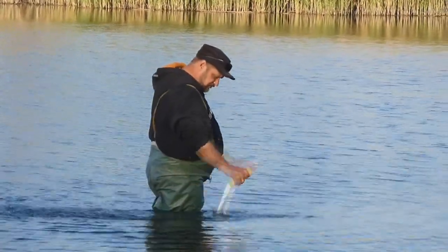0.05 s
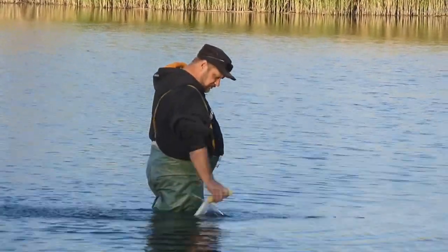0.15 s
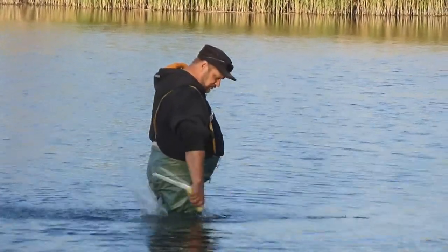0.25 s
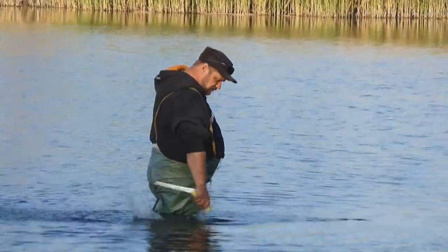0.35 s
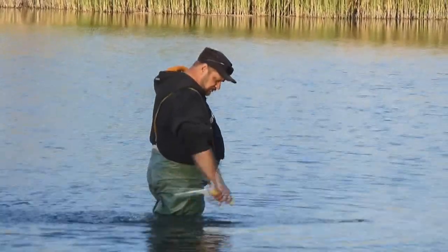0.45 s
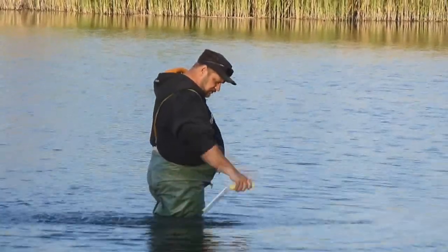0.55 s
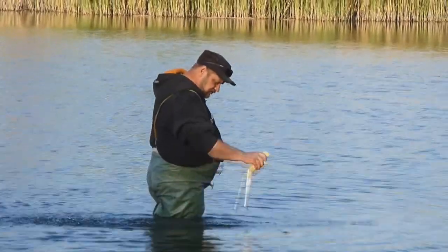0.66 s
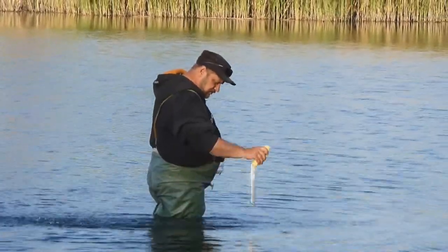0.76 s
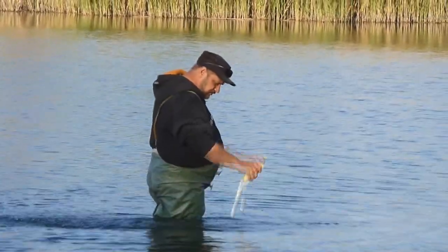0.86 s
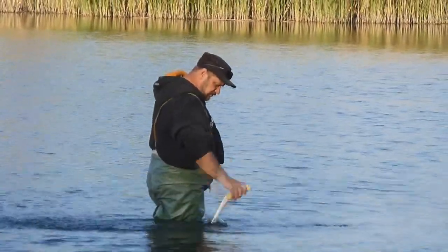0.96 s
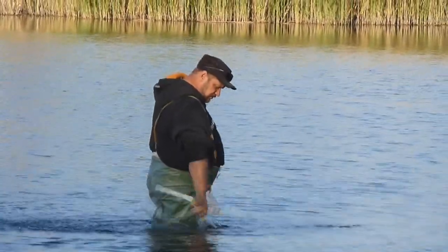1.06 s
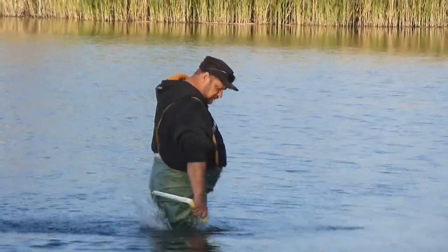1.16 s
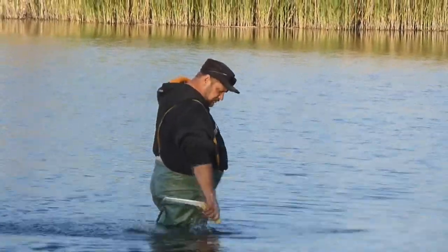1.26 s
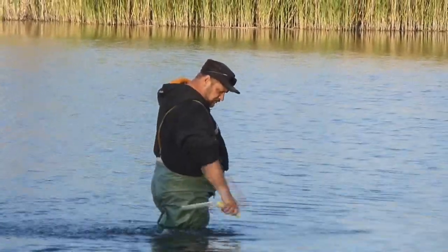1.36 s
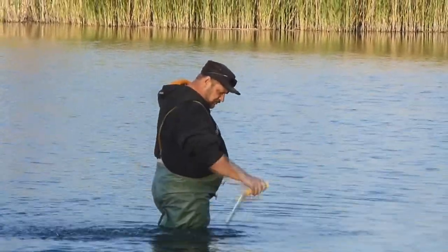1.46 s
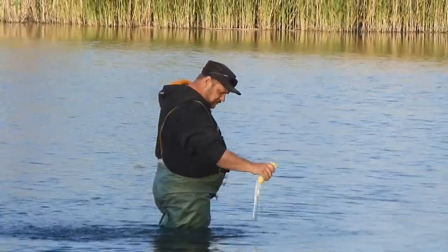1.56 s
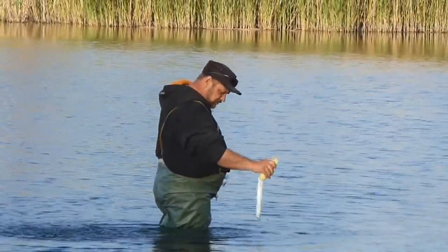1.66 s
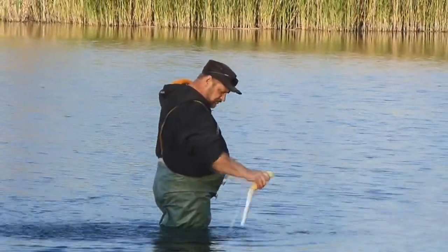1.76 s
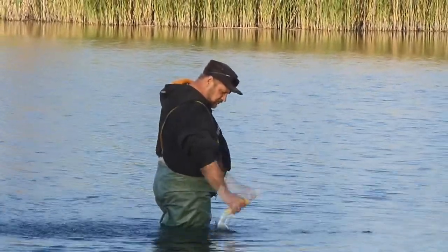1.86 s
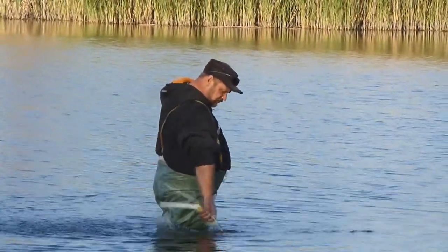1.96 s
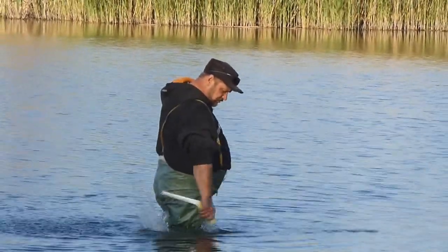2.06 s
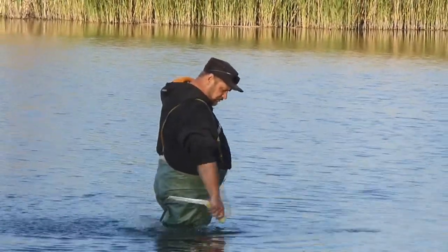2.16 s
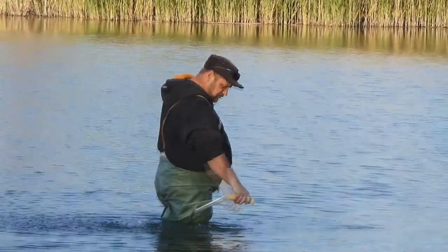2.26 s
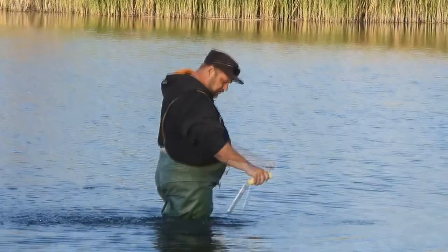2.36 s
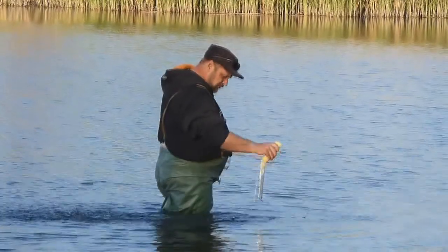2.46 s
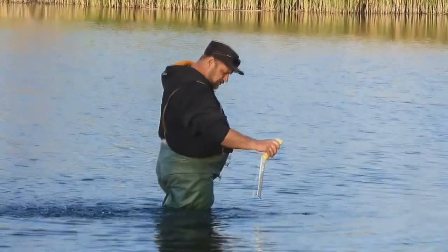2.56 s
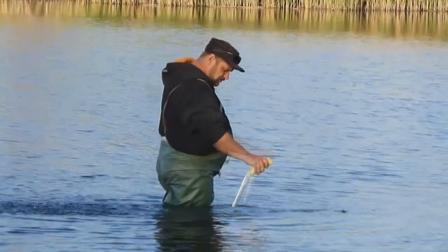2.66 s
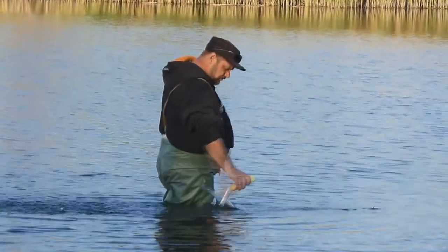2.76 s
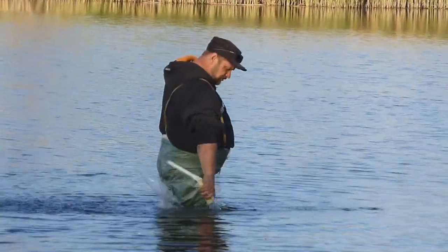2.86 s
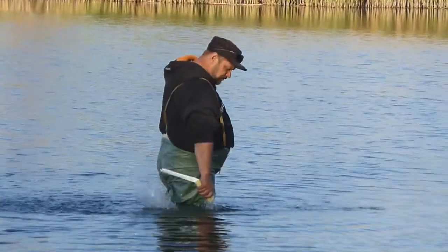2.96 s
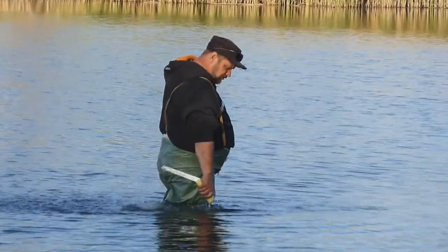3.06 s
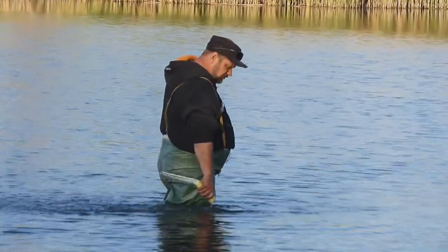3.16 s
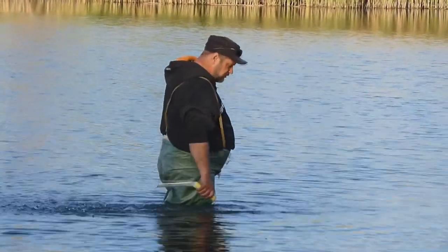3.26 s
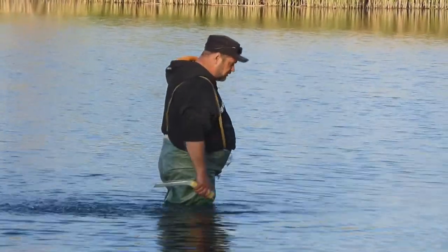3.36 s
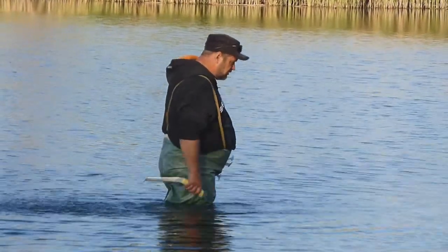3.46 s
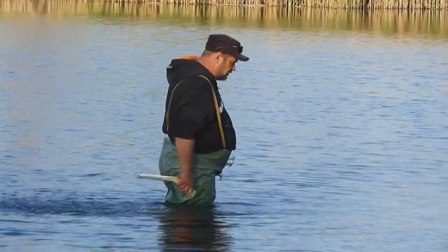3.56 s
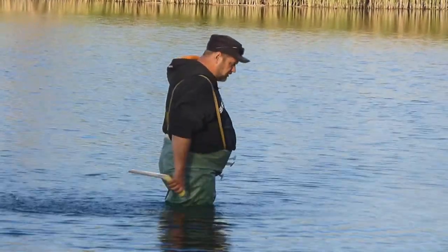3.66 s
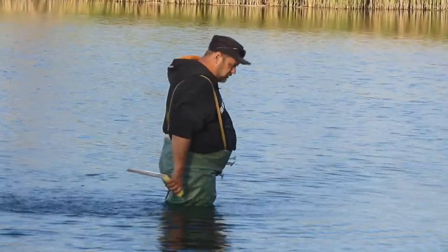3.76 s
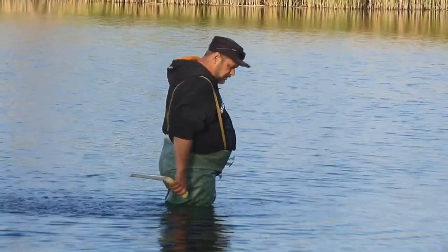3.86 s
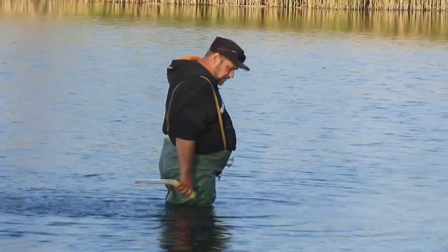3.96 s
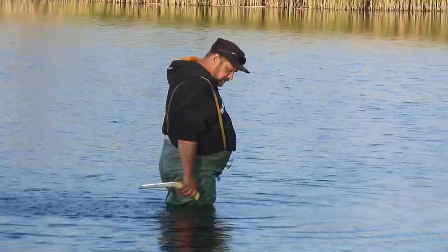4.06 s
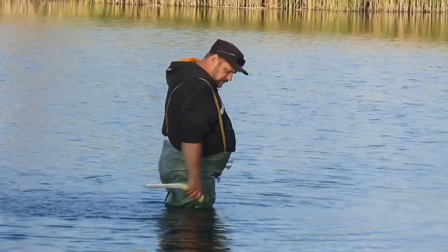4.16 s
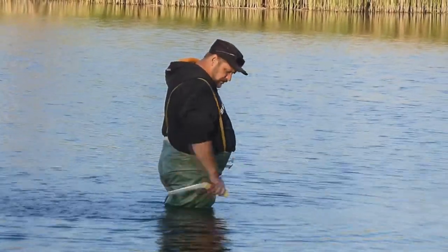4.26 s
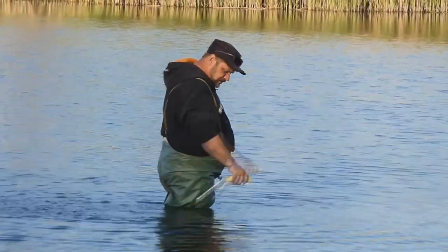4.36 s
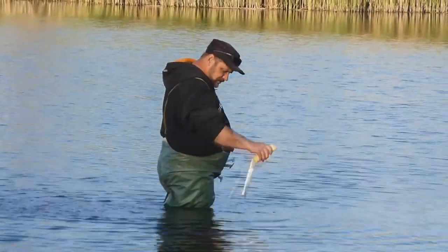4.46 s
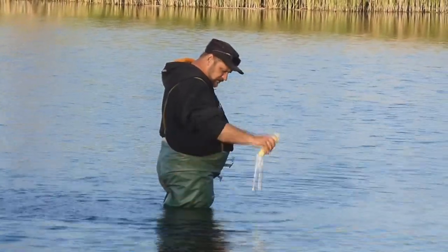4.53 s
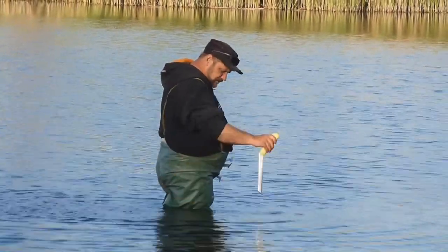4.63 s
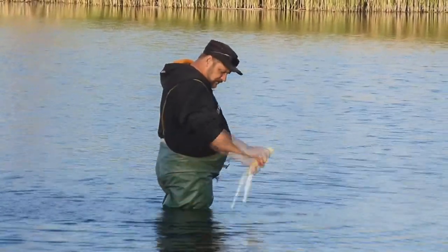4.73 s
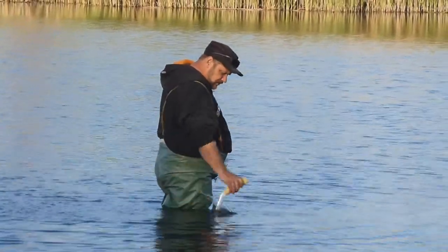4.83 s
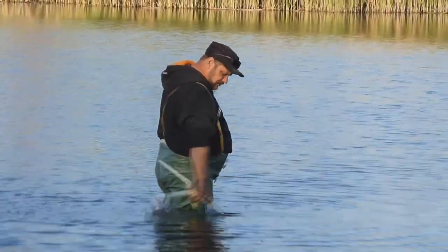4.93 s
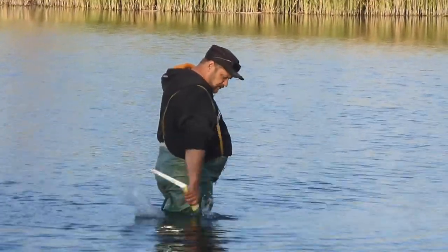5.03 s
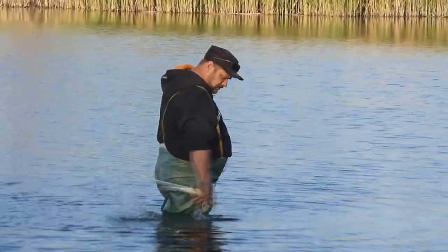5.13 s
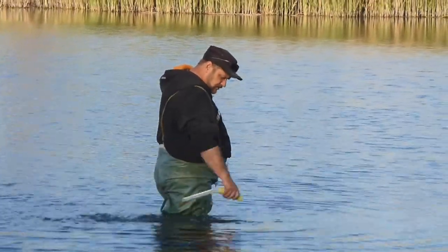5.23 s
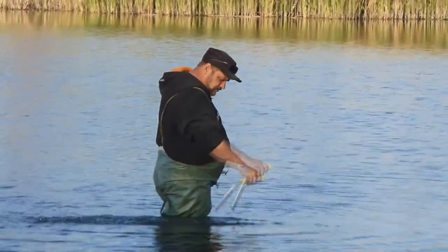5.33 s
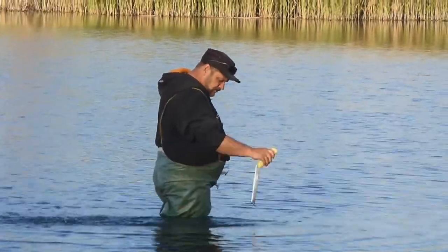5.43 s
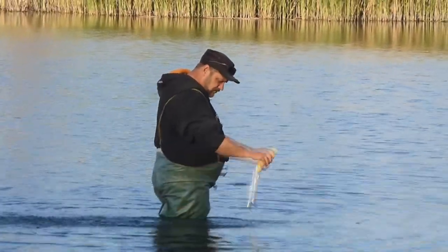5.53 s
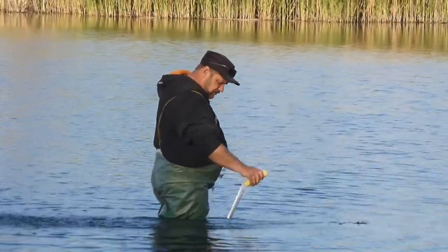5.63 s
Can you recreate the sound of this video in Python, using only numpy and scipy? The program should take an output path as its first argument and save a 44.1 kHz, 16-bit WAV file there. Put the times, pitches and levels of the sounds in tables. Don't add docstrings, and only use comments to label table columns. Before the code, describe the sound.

Outdoors on open water, short low gulping plops dominate, each with a light splash, brief spray hiss and a few ringing drips. Four come regularly, then birds and lapping fill a gap with a soft low wind rumble on the microphone, before one last plop. Far birds whistle, pipe, chirp and trill throughout, much quieter than the strokes, with faint dry ticks close to the microphone.

```python
import sys
import numpy as np
from scipy import signal
from scipy.fft import rfft, irfft
from scipy.io import wavfile
from scipy.ndimage import uniform_filter1d, map_coordinates

SR = 44100
rng = np.random.default_rng(int(sys.argv[2]) if len(sys.argv) > 2 else 0)


def makeup_ratio(level_db):
    decades = np.asarray(level_db, float) / 20
    return 10 ** decades


def wav_out(sig):
    wavfile.write(sys.argv[1], SR, np.round(np.clip(np.atleast_2d(sig).T, -1, 1) * 32767).astype(np.int16))


N = 250929

# t/s, level/dB, open f/Hz, closing moment/ms, first swing/ms
CAVITIES = [
    (.3166, -3.2, 195, 5.5, 5.4),
    (1.1696, -1.2, 221, 9.8, 8.6),
    (2.066, -5.3, 165, 6.3, 7.6),
    (2.9438, -1.7, 200, 10.5, 9.7),
    (5.0329, -2.2, 205, 7.4, 6.6),
]
# t/s, splash peak level/dB, low push level/dB, foot ring f/Hz, hiss level/dB
ENTRIES = [
    (0.298, -26, -22, 650, -45),
    (1.161, -19.5, -22, 656, -60.5),
    (2.047, -30, -22, 650, -46),
    (2.934, -21, -39, 740, -47.5),
    (5.012, -27.5, -23.5, 706, -46),
]
# t/s, peak level/dB, ring f/Hz, hiss level/dB
TEARS = [
    (0.317, -26, 640, -45),
    (1.169, -25, 1020, -63),
    (2.065, -26.5, 653, -39),
    (2.944, -27, 990, -56),
    (5.034, -25, 685, -63),
]
# f/Hz, level/dB per Hz
SPRAY_SPECTRUM = [(290, -9), (500, -4), (603, -6.5), (827, -14), (1580, -12), (2760, -15), (3330, -15.5),
                  (4910, -25.5), (7670, -29.5), (15500, -44.5)]
# f/Hz, T60/s
BANK_T60 = [(120, .25), (220, .45), (330, 1.1), (500, .6), (1500, .35), (4000, .6), (9000, .5)]
# t/s, f/Hz, peak level/dB, decay/cycles
DRIPS = [(.372, 990, -44, 8), (.42, 600, -43, 6.9), (.475, 1110, -46, 10), (.52, 1110, -45, 7.6),
         (1.22, 586, -41, 8.5), (1.405, 1090, -55, 8), (2.12, 950, -53, 8), (2.232, 707, -41.5, 9),
         (2.244, 1110, -45, 7.8), (2.38, 796, -49.5, 11), (2.509, 1060, -56, 14), (2.988, 1180, -41.5, 5.3),
         (5.05, 1234, -45, 13)]
# t/s, peak level/dB
TICKS = [(0.1141, -41.5), (0.8111, -56), (0.854, -41), (0.8959, -40), (1.4097, -45.5), (1.8194, -46.5),
         (2.8067, -42), (3.2694, -52), (4.1294, -44), (5.1826, -45), (5.4475, -50)]
# t/s, f/Hz, rms level/dB
GLIDES = [
    [(0.25, 3210, -61), (0.34, 3980, -53), (0.4, 4440, -71), (0.445, 4120, -63), (0.49, 2920, -57)],
    [(2.47, 3570, -63), (2.534, 3470, -68), (2.6, 4000, -64), (2.68, 4580, -55), (2.722, 4570, -89)],
    [(2.735, 8300, -74), (2.8, 8260, -54), (2.83, 7400, -51.5), (2.875, 6970, -54), (2.939, 5200, -57.5),
     (3.02, 4490, -58.5), (3.11, 4200, -64), (3.27, 3300, -58), (3.43, 2990, -74)],
    [(4.205, 3750, -68), (4.266, 3660, -66), (4.37, 4310, -65.5), (4.42, 3700, -61), (4.48, 3750, -70)],
    [(5.59, 2333, -53.5), (5.665, 2246, -49.5), (5.681, 1830, -56), (5.69, 1760, -35)],
]
# t/s, length/s, peak level/dB, lower octave level/dB
PIPES = [
    (3.455, .1, -45, -56.5),
    (3.535, 0.083, -56, -73),
    (3.63, 0.11, -44.5, -57),
    (3.71, 0.078, -48.5, -61),
    (3.81, 0.2, -58, -74),
]
# t/s, length/s, f/Hz, peak level/dB
PEEPS = [(0.652, .012, 4170, -52), (.664, .012, 3500, -54), (.73, 0.01, 3380, -51),
         (1.106, 0.023, 4850, -59.5), (1.131, .017, 4430, -54), (1.56, .13, 2820, -62.5),
         (1.461, 0.16, 2068, -60.5), (2.185, 0.19, 3000, -67), (2.439, 0.14, 2890, -60.5),
         (4.413, 0.07, 3290, -62), (4.85, 0.093, 2533, -53), (4.938, 0.023, 2575, -48.5),
         (5.25, 0.04, 4330, -60)]
# t/s, length/s, first f/Hz, last f/Hz, peak level/dB
SLIDES = [(0, 0.032, 3490, 3130, -49.5), (0.63, 0.01, 5200, 4750, -60), (0.801, .095, 2480, 2976, -48),
          (.84, 0.077, 1600, 1840, -58), (1.462, .055, 2890, 2500, -55), (2.353, 0.088, 2810, 2550, -57),
          (2.359, .11, 3370, 3580, -62), (3.76, 0.073, 2780, 2680, -59), (3.83, 0.033, 2900, 3520, -53),
          (3.997, .025, 3670, 3400, -59.5), (4.13, 0.025, 3300, 3580, -55), (4.362, 0.023, 4400, 6060, -54),
          (4.422, .028, 4200, 5550, -58), (4.624, 0.033, 3730, 4100, -62), (5.056, .2, 1910, 1500, -61),
          (5.124, 0.064, 3300, 4330, -61), (5.348, 0.046, 2140, 1770, -45), (5.448, 0.053, 3900, 5730, -59),
          (5.517, .04, 5350, 4900, -65.5), (5.57, 0.032, 2850, 2400, -63), (2.84, .05, 14900, 12800, -67)]
# t/s, length/s, end f/Hz, top f/Hz, peak level/dB
ARCHES = [(.01, 0.018, 4240, 4470, -49), (0.358, 0.095, 2780, 3080, -56), (4.058, 0.086, 3360, 5600, -62),
          (4.08, 0.032, 3970, 4500, -55), (4.585, 0.061, 2705, 2844, -50.5)]
# t/s, top f/Hz, peak level/dB
CHIRPS = [(3.972, 2550, -42.5), (4.121, 2470, -44.5), (4.294, 2560, -43), (4.451, 2550, -42)]
# delay t/s, length/s, f ratio, level/dB
CHIRP_PAIR = [(0, .034, 0.98, 0.5), (0.056, .028, 1.01, -1)]
# start t/s, notes, first f/Hz, last f/Hz, peak level/dB
TRILLS = [
    (3.127, 10, 3350, 3000, -51),
    (5.133, 7, 3150, 3100, -46.5),
]
# start t/s, end t/s, centre f/Hz, swing f/Hz, swing rate f/Hz
WARBLE = (5.4, 5.54, 1880, 400, 41.7)
# t/s, length/s, first f/Hz, last f/Hz, rms level/dB
RASPS = [(0, .1, 4300, 4450, -57), (.13, .17, 2100, 2020, -55), (.525, .07, 4400, 5600, -58),
         (.57, .07, 2700, 2750, -57), (.79, .07, 3300, 3350, -63), (.795, .1, 2500, 2950, -54),
         (.895, .03, 2600, 2700, -52), (2.63, .07, 2650, 2650, -59), (2.82, .08, 2600, 2600, -50),
         (2.83, .06, 1600, 1400, -58), (3.01, .04, 6700, 6300, -63), (4.81, .03, 2300, 1600, -61),
         (5.21, .05, 2700, 2100, -57), (5.35, .07, 3600, 3300, -63)]
# t/s, far chorus level/dB
CARRY = [(0, -52), (.25, -54), (.45, -54), (.8, -52), (1.04, -57.5), (1.3, -59.5), (1.55, -55),
         (1.8, -60.5), (2.2, -54.5), (2.7, -57.5), (3.1, -54.5), (3.5, -60), (4.45, -56.5), (4.75, -54.5),
         (5.2, -54.5), (5.55, -55.5), (5.69, -57)]
# f/Hz, level/dB per Hz
WATER_SPECTRUM = [(35, -55), (60, -18), (134, 1.5), (173, -2), (231, 1.5), (534, -3.5), (1430, -8),
                  (1560, -8.5), (2000, -14.5), (2600, -16), (4400, -120)]
CHORUS_SPECTRUM = [(650, -18), (1100, -12.5), (2000, -5.5), (2400, -4.5), (2630, -1.5), (3680, -8),
                   (5020, -12.5), (6000, -15), (7800, -52), (13200, -120)]
REEDS_SPECTRUM = [(2060, -34), (3500, -4), (4490, -13.5), (5380, -11), (6060, -5), (6740, -0.5),
                  (11800, -7.5), (15600, -12.5)]
BUFFET_SPECTRUM = [(12, -39.5), (20, -8), (48, -6), (65, 0), (107, -2), (200, -21), (260, -45), (440, -120)]
DRONE_SPECTRUM = [(400, -43), (480, -7), (520, 6.5), (560, -5), (680, -38)]
# start t/s, top t/s, hold until t/s, end t/s, top level/dB
GUST = (4.0, 4.24, 4.72, 4.95, -48)
# start t/s, top t/s, rise level/dB
AFTER_GUST = (5.3, 5.7, 7)
# f/Hz, rms level/dB
WHINE = [(15625, -88)]

CLOSED_HZ = 410
TEAR_T60_S = 0.04
PIPE_HZ = 3154
TRILL_STEP_S = .023
WATER_DB, WATER_FOLLOWS = -56, 0.2
REEDS_DB, REEDS_FOLLOW = -65.7, 0.28
WASH_DB, WASH_S = 0.5, 0.23
CALM_DB = -71
DRONE_DB = -67


def unit(x):
    return x / np.sqrt(np.mean(x ** 2) + 1e-20)


def along(points, hz):
    f, v = np.transpose(points)
    return np.interp(np.log(hz + 1), np.log(f + 1), v)


def curves(rows):
    s, *cols = np.transpose(rows)
    return [np.interp(np.arange(N) / SR, s, c) for c in cols]


def wobble(rate):
    knots = rng.standard_normal(int(N * rate / SR) + 4)
    return map_coordinates(knots, [np.arange(N) * rate / SR])


def rush(spectrum, patchy_db):
    hz, _, z = signal.stft(rng.standard_normal(N + SR), SR, nperseg=2048)
    field = uniform_filter1d(rng.standard_normal(z.shape), size=14, axis=0)
    field = uniform_filter1d(field, size=3, axis=1)
    gain = makeup_ratio(patchy_db * unit(field) + along(spectrum, hz)[:, None])
    noise = signal.istft(z * gain, SR, nperseg=2048)[1]
    return unit(noise[:N])


def add(track, s, x):
    part = track[max(round(s * SR), 0):][:len(x)]
    part += x[:len(part)]


def tone(hz):
    return 2 * np.pi * np.cumsum(hz) / SR


def bank_echo(x, delay):
    hz, t, z = signal.stft(rng.standard_normal(SR), SR, nperseg=512)
    decay = makeup_ratio(-60 * t / along(BANK_T60, hz)[:, None])
    tail = signal.istft(z * decay, SR, nperseg=512)[1]
    delayed = np.pad(x, (round(delay * SR), 0))
    return signal.fftconvolve(delayed, tail / np.linalg.norm(tail))[:N]


def plops():
    out, ms = np.zeros(N), np.arange(SR // 8) / SR * 1000
    for s, db, open_hz, closing, swing in CAVITIES:
        closed = 1 / (1 + np.exp(-(ms - closing) / 2.45))
        hz = open_hz + (CLOSED_HZ - open_hz) * closed + ms
        bubble = .12 * np.exp(-(ms / (9 + 1.6 * swing)) ** 4) + .055 * np.exp(-ms / 25)
        rise = 1 - np.exp(-(ms / 2.11) ** 1.46)
        envelope = rise * (np.exp(-(ms / (.86 * swing)) ** 2) + bubble)
        cavity = makeup_ratio(db) * envelope * np.sin(tone(hz) - 1.35)
        add(out, s, cavity)
        brighter = np.diff(cavity) * SR / (2 * np.pi * 330)
        add(out, s, makeup_ratio(-32 + 0.59 * swing) * bank_echo(brighter, delay=.03))
    return out


def droplets(length, spread, count=50):
    when, pitch, size = rng.random((count, 3)).T
    hz, t = 700 * 11 ** pitch, np.arange(round(length * SR)) / SR
    age = np.clip(t + spread * np.log(when)[:, None], 0, None) * hz[:, None]
    gain = makeup_ratio(along(SPRAY_SPECTRUM, hz) * 1.16 - 2.26 * np.log(size))
    gain = gain * hz / 1000 * when ** 0.6
    burst = gain @ (np.exp(-age / 5.0) * (1 - np.exp(-age / 0.51)) * np.sin(2 * np.pi * age))
    return burst / np.abs(burst).max()


def splash():
    out, hiss, t = np.zeros(N), np.zeros(N), np.arange(SR // 5) / SR
    for s, db, push_db, hz, hiss_db in ENTRIES:
        add(hiss, s - .002, makeup_ratio(hiss_db + 11.0 - 60 * t / 0.13) * (1 - np.exp(-t / 0.0011)))
        add(out, s - .001, makeup_ratio(db - 5.5) * droplets(.1, spread=0.0045))
        add(out, s, makeup_ratio(db - 7.0 - 60 * t / 0.033) * np.sin(2 * np.pi * hz * t))
        sag = tone(58 + 210 * np.exp(-t / .0035))
        push = makeup_ratio(push_db + 3 - 60 * t / .09) * (1 - np.exp(-t / .002))
        add(out, s - .002, push * np.sin(sag))
    for s, db, hz, hiss_db in TEARS:
        burst = makeup_ratio(hiss_db + 7.5 - 60 * t / TEAR_T60_S)
        lingering = makeup_ratio(db - 16.5 - 60 * t / 0.28)
        add(hiss, s - .002, (burst + lingering) * (1 - np.exp(-t / 0.0023)))
        add(out, s, makeup_ratio(db - 4.5) * droplets(.15, spread=.007))
        add(out, s + 0.00088, makeup_ratio(db - 3.0 - 60 * t / 0.046) * np.sin(2 * np.pi * hz * t))
    spray = unit(makeup_ratio(5.6 * wobble(500)) * rush(SPRAY_SPECTRUM, patchy_db=-1.0))
    return out + hiss * spray


def drops():
    out, t = np.zeros(N), np.arange(SR // 10) / SR
    for s, hz, db, cycles in DRIPS:
        age = t * hz / cycles
        envelope = np.exp(-2.5 * age) * (1 - np.exp(-9 * age))
        add(out, s, makeup_ratio(db + 6.5) * envelope * np.sin(tone(hz * (1 + 0.084 * age))))
    for s, db in TICKS:
        click = np.convolve(rng.standard_normal(len(t)), [.3, .3, -.6, -.6, .3, .3], "same")
        add(out, s, makeup_ratio(db - 9 - 60 * t / .014) * click)
    return out


def note(length, first_hz, middle_hz, last_hz, edge):
    u = np.arange(round(length * SR)) / (length * SR)
    hz = first_hz * (2 * u - 1) * (u - 1) + 4 * middle_hz * u * (1 - u) + last_hz * u * (2 * u - 1)
    return tone(hz), np.sin(np.pi * u) ** edge


def glides():
    out, t = np.zeros(N), np.arange(N) / SR
    for rows in GLIDES:
        hz, db = curves(rows)
        on = np.clip(np.minimum(t - rows[0][0], rows[-1][0] - t) / 0.011, 0, 1)
        phase = tone(uniform_filter1d(hz, size=700) * (1 + .006 * wobble(20)))
        out += on * makeup_ratio(db + 5.5) * (np.sin(phase) + makeup_ratio(-29) * np.sin(2 * phase))
    return out


def whistles():
    out = np.zeros(N)
    for s, length, db, low_db in PIPES:
        phase, size = note(length, PIPE_HZ, PIPE_HZ, PIPE_HZ, edge=0.51)
        pipe = makeup_ratio(db) * size ** 3 * np.sin(phase + 0.46 * np.sin(phase / 45))
        add(out, s, pipe + makeup_ratio(low_db) * size * np.sin(phase / 2))
    notes = [(s, length, hz, hz, hz, db) for s, length, hz, db in PEEPS]
    notes += [(s, length, hz, (hz + last_hz) / 2, last_hz, db) for s, length, hz, last_hz, db in SLIDES]
    notes += [(s, length, hz, top_hz, hz, db) for s, length, hz, top_hz, db in ARCHES]
    for s, length, *hz, db in notes:
        phase, size = note(length, *hz, edge=0.19)
        add(out, s, makeup_ratio(db) * size * np.sin(phase))
    return out


def chirps():
    out = np.zeros(N)
    for s, top_hz, top_db in CHIRPS:
        for lag, length, ratio, step_db in CHIRP_PAIR:
            hz, db = top_hz * ratio, top_db + step_db
            phase, size = note(length, .9 * hz, hz, .66 * hz, edge=.5)
            beats = np.abs(np.sin(np.linspace(-.7, 1.3, len(size)) ** 3 * np.pi * 1.68 + 1.87))
            voice = np.sin(phase) + makeup_ratio(-11) * np.sin(phase * .52)
            add(out, s + lag, makeup_ratio(db) * size * beats * voice)
    return out


def trills():
    out = np.zeros(N)
    for s, count, *ends, db in TRILLS:
        for k, hz in enumerate(np.linspace(*ends, round(count))):
            phase, size = note(0.0073, 1.007 * hz, 1.017 * hz, 0.81 * hz, edge=0.9)
            level = makeup_ratio(db + 2.1 * rng.normal())
            add(out, s + k * TRILL_STEP_S - .003, level * size * np.sin(phase))
    return out


def warble():
    out = np.zeros(N)
    start, end, hz, swing_hz, rate = WARBLE
    u = np.arange(round((end - start) * SR)) / SR
    swing = -np.cos(2 * np.pi * rate * (u + .003))
    swell = np.sin(np.pi * (u / u[-1]) ** 1.2)
    phase = tone(hz + swing_hz * swing * swell ** .5)
    add(out, start, makeup_ratio(-47 + 4 * swing) * swell ** .2 * np.sin(phase))
    return out


def rasps():
    out, grain = np.zeros(N), wobble(354)
    for s, length, hz, last_hz, db in RASPS:
        phase, size = note(length, hz, (hz + last_hz) / 2, last_hz, edge=0.46)
        rough = grain[round(s * SR):][:len(size)]
        add(out, s, makeup_ratio(db + 3) * size * rough * np.sin(phase))
    return out


def birds():
    songs = glides() + whistles() + chirps() + trills() + warble() + rasps()
    songs *= makeup_ratio(1.3 * wobble(40) + 2.2 * wobble(140))
    return songs + makeup_ratio(-7.5) * bank_echo(songs, delay=.006)


def buffeting():
    t = np.arange(N) / SR
    *when, top_db = GUST
    gust_db = np.interp(t, when, [CALM_DB, top_db, top_db - 4.5, CALM_DB])
    gust_db = gust_db + np.interp(t, AFTER_GUST[:2], [0, AFTER_GUST[2]]) + .6 * wobble(4)
    return makeup_ratio(gust_db) * unit(makeup_ratio(1.6 * wobble(16)) * rush(BUFFET_SPECTRUM, patchy_db=2.5))


def air():
    chorus_db, = curves(CARRY)
    carry, shared, t = chorus_db - chorus_db.mean(), wobble(2.57), np.arange(N) / SR
    stirred = sum((t > s) * np.exp(-np.abs(t - s) / WASH_S) for s, *_ in CAVITIES)
    water_db = WATER_DB + WATER_FOLLOWS * carry + WASH_DB * stirred + 0.61 * shared
    water = makeup_ratio(water_db) * rush(WATER_SPECTRUM, patchy_db=2.5)
    chorus = makeup_ratio(chorus_db - 1.5 + 1.5 * wobble(26)) * rush(CHORUS_SPECTRUM, patchy_db=2.5)
    reeds_db = REEDS_DB + REEDS_FOLLOW * carry + 0.32 * shared + 0.7 * wobble(13)
    reeds = makeup_ratio(reeds_db) * rush(REEDS_SPECTRUM, patchy_db=2.9)
    drone = makeup_ratio(DRONE_DB + .4 * carry) * rush(DRONE_SPECTRUM, patchy_db=0.5)
    return water + chorus + reeds + buffeting() + drone


def scene():
    strokes = signal.lfilter(*signal.butter(3, 98, "high", fs=SR), plops() + splash())
    strokes = signal.filtfilt(*signal.butter(2, 55, "high", fs=SR), strokes)
    return (strokes + drops() + birds() + air())[None]


def band_limit(x):
    return signal.sosfilt(signal.butter(12, 15700, fs=SR, output="sos"), x)


def record(dry):
    t = np.arange(N) / SR
    whine = sum(makeup_ratio(db + 8) * np.sin(2 * np.pi * hz * t) for hz, db in WHINE)
    passed = np.fft.rfftfreq(N, 1 / SR) < 15690
    mix = irfft(rfft(dry + whine) * passed, N)
    return band_limit(mix)


dry = scene()
out = record(dry)
wav_out(out)
```